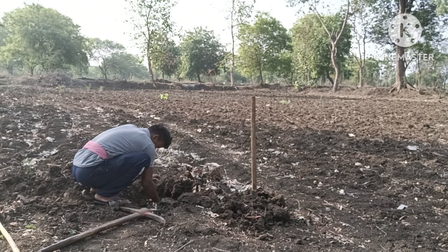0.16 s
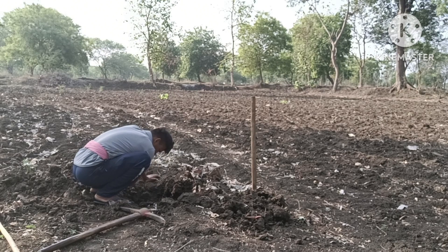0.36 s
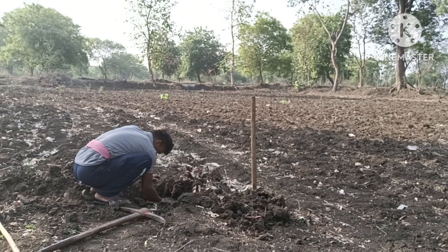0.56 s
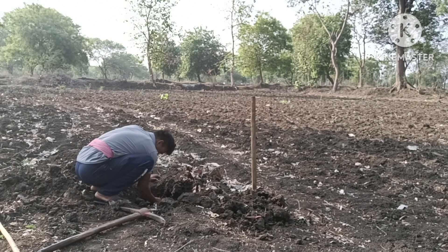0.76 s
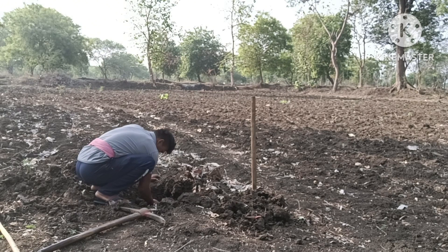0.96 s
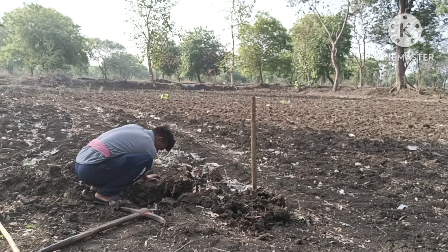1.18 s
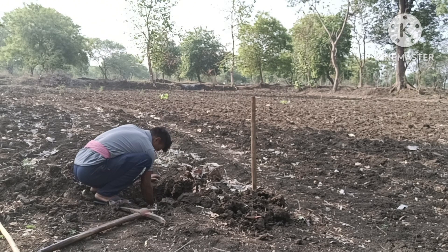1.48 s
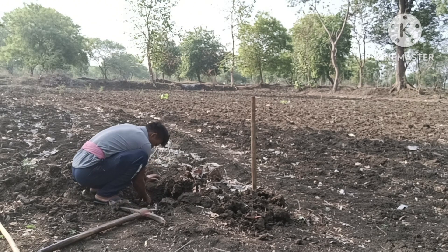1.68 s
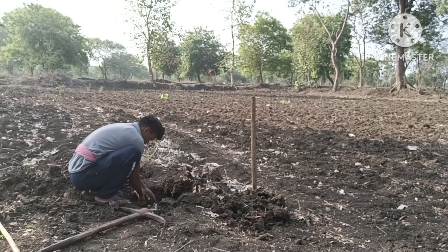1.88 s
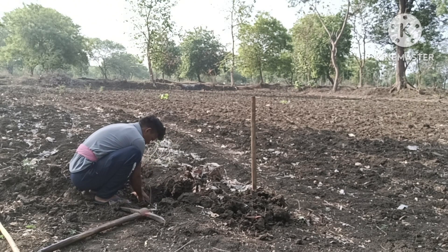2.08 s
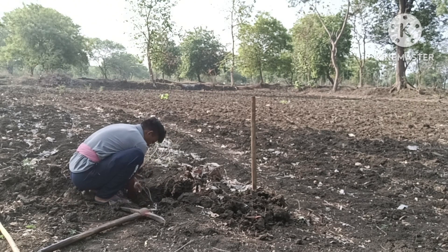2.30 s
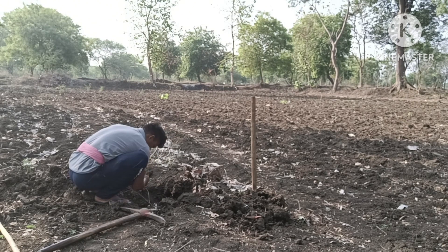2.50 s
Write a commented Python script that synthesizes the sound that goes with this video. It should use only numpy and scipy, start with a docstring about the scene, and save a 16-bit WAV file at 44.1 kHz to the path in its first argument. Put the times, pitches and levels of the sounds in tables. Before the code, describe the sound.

Hands scrape loose dry soil on the left, crumbs clicking in faint rustles; just before two seconds a handful lands sharply, then quieter scraping. Open field, thin bird chips, low breeze buffeting the stereo microphone.

```python
"""Crumbs click as hands rake loose dry soil in a shallow pit; one handful lands in a short, sharp spray.
The pit lies to the left in an open field: the right microphone port hears it weaker, later and scattered.
Strokes and spray are streams of tiny grain impacts; crumbs and clods are short damped rings with noise.
Small birds chip high and thin in the trees as gliding sines, with a short echo.
A breeze of banded noise and single eddies buffets each port on its own, over a faint hiss of air."""
import sys
import numpy as np
from scipy import signal
from scipy.fft import rfft, irfft, next_fast_len
from scipy.io import wavfile
from scipy.ndimage import uniform_filter1d

SR = 44100
rng = np.random.default_rng(int(sys.argv[2]) if len(sys.argv) > 2 else 0)


def int16_out(signal):
    """Quantize to a 16-bit WAV file."""
    q = np.round(np.clip(np.atleast_2d(signal).T, -1, 1) * 32767)
    wavfile.write(sys.argv[1], SR, q.astype(np.int16))


N = 116865
T = np.arange(N) / SR  # time [s]
SIZE = next_fast_len(N)

# hand strokes through the soil:
# (start [s], rise [s], hold [s], fall time constant [s], level [dB], treble tilt [dB per octave])
HAND_STROKES = [(0.07, 0.015, 0.014, 0.3, -62, -0.5), (0.349, 0.067, 0.048, 0.074, -55, -1),
                (0.734, 0.021, 0.066, 0.043, -63.5, 1.5), (1.096, 0.036, 0.16, 0.04, -54, 1),
                (1.631, 0.062, 0.013, 0.054, -43, -0.03), (1.789, 0.016, 0.0087, 0.018, -56, -7),
                (1.926, 0.022, 0.074, 0.036, -51, 0), (2.292, 0.029, 0.017, 0.044, -61.5, -6),
                (2.384, 0.11, 0.093, 0.033, -52, 1.2)]
# colour of the dry soil: (frequency [Hz], gain [dB])
SOIL_COLOUR = [(300, -42), (800, -22.5), (1500, -8), (2500, -5), (4000, -4), (5500, 2), (8000, -4),
               (12000, -1), (15500, -0.5)]
TRICKLE_DB, TRICKLE_PER_S, TRICKLE_SPREAD_DB = -70, 130, 6.5

# the grains that make up every stream of soil
GRAINS_PER_S, GRAIN_SPREAD_DB, GRAIN_CYCLES = 3400, 2, 6.9  # fall time in cycles of each band
CLUMP_DB, CLUMP_S = 2.7, 0.0083
GRAIN_HZ = 500 * 2 ** np.arange(0, 5.1, .5)  # half-octave band centres
# sharply snapping grains: damping, level beside the rustle, share of the rate, spread of size
SNAP_DAMP_S, SNAP_DB, SNAP_SHARE, SNAP_SPREAD_DB = .00035, 1.5, .45, 4.5
PINGS_PER_S, PING_RING_S, PING_SPREAD_DB, PING_DB = 800, .0018, 3.6, -4

# colour of the thrown handful: (frequency [Hz], gain [dB])
HANDFUL_COLOUR = [(300, -12), (480, -13.5), (700, -5), (950, -9.5), (1500, -4.5), (2300, -2.5),
                  (4500, -3.5), (8000, -3), (15500, -1.5)]
THROW_S, THROW_RISE_S, THROW_HOLD_S, THROW_FALL_S = 1.8422, 0.00073, 0.052, 0.023
THROW_DB, THROW_PER_S = -31, 7600

# single crumbs and grit snapping:
# (start [s], level before trim and colour [dB], ring pitch [Hz], relative setting of the crack [dB])
CRUMB_SNAPS = [(.0345, -44, 5200, -14), (0.043, -40, 5300, -16), (.112, -27.5, 6400, 5),
               (.301, -43, 5540, -12), (0.341, -45, 5000, -5), (0.346, -34, 4340, -11),
               (.4421, -15, 6240, 6), (0.474, -35.5, 5500, -11), (.532, -27.5, 4860, -3),
               (.607, -33.5, 6200, -27), (.617, -32, 4950, -23), (0.6593, -41.5, 6040, -6),
               (.748, -36, 5740, -11), (.766, -38, 7300, 8), (0.7842, -28.5, 10700, -12),
               (.812, -30.5, 10500, 2), (1.0187, -32.5, 4960, -17), (1.071, -53, 10400, 20),
               (1.13, -48, 7100, 2), (1.14, -30.5, 6900, 8), (1.201, -31, 9000, 5), (1.208, -30, 6750, 12),
               (1.222, -25.5, 7600, -7), (1.23, -24.5, 5560, 0), (1.2605, -50, 13000, -2),
               (1.2745, -25, 9100, 6), (1.3177, -32, 10000, 1), (1.474, -48, 5500, 2),
               (1.5105, -42, 10400, -5), (1.542, -42.5, 11000, 3), (1.576, -43.5, 10000, 0),
               (1.662, -34, 2900, -12), (1.681, -23.5, 10600, 6), (1.847, -13, 9200, -3),
               (1.8487, -27, 10000, -4), (1.865, -16, 5430, -8), (1.888, -12.5, 5000, -11),
               (1.913, -17, 6000, -3), (1.964, -32, 7400, 7), (2.3385, -42, 6100, 11),
               (2.4215, -34, 12000, -14), (2.471, -39.5, 7060, 3)]
# small crumbs radiate little bass: (frequency [Hz], gain [dB])
CRUMB_BODY = [(400, -6.5), (1000, -12), (2000, -4), (4000, 0.5), (15500, -3.5)]
CRUMB_RING_S, CRUMB_CRACK_S, CRUMB_CRUNCH_S = 0.00032, 0.00018, 0.0041
DUST_FALL_S, DUST_DB, CRUMB_TRIM_DB = 0.0064, -17.5, -4.5

# larger clods knocking dully: (start [s], level [dB], pitch [Hz], fall time constant [s])
CLOD_KNOCKS = [(.036, -69, 900, .006), (.655, -74, 700, .012), (.811, -67, 750, .007),
               (1.068, -64, 750, 0.0059), (1.849, -42, 690, .009), (2.468, -68.5, 800, 0.0068)]

# shading of the soil at the far, right port: (frequency [Hz], gain [dB])
FAR_PORT_SHADING = [(600, -1.5), (1300, 5.5), (2200, 7.5), (4400, -4.5), (8000, -2.5), (15000, -4.5)]
SOIL_RIGHT_DB, SOIL_LAG_S, SOIL_DIFFUSE, SOIL_SCATTER_S = -8.5, .00026, 1, 0.0056

# bird note shapes, each: (share of the note [0 to 1], pitch before the note's factor [Hz], level [dB])
SLUR = [(0, 11800, -28), (0.199, 11330, -8.5), (0.378, 8800, -13), (.52, 6750, -4), (.68, 6020, -2.5),
        (0.999, 4890, -22.5)]
CHIP = [(0, 5600, -27), (.25, 7120, 0), (.6, 8300, -5), (1, 8000, -35)]
WHISTLE = [(0, 5830, -8), (.2, 5520, -4), (.45, 5380, -3), (.75, 5400, -3.5), (.9, 5520, -6), (1, 5780, -8)]
TSIP = [(0, 11300, -6), (.25, 12100, -7), (.6, 11930, -9.5), (1, 11800, -20)]
FALL = [(0, 13400, -12), (.4, 12840, -3), (1, 11900, -16)]
RISE = [(0, 7700, -2), (0.301, 8600, -13), (0.699, 9200, 0), (1, 10100, -7)]
# bird notes: (start [s], length [s], pitch factor [ratio], level added to the shape [dB], shape [table])
BIRD_NOTES = [(0.111, .12, 0.98, -62, WHISTLE), (0.137, 0.016, 1, -66, CHIP),
              (0.197, 0.044, 0.99, -63.5, SLUR), (0.341, 0.018, 0.98, -64, CHIP),
              (.396, .048, .98, -62, SLUR), (.568, 0.014, 1.01, -64, FALL), (.657, .02, 1, -63.5, FALL),
              (.85, .018, 0.96, -67, TSIP), (0.912, 0.071, 1, -66, TSIP), (1.077, 0.033, .95, -64, TSIP),
              (1.325, .03, 1.03, -63, TSIP), (1.353, .05, 1.08, -66, TSIP),
              (1.416, 0.058, 1.04, -68.5, RISE), (1.434, 0.013, .94, -66, FALL),
              (1.462, .03, 1.04, -67, TSIP), (1.559, 0.046, 0.98, -74, RISE), (1.599, .03, 1.05, -67, TSIP),
              (2.073, 0.038, 0.94, -57.5, SLUR), (2.216, 0.017, 0.96, -60, CHIP),
              (2.272, 0.049, 0.94, -58, SLUR), (2.436, 0.017, 1, -61.5, CHIP), (2.489, 0.057, 1, -59, SLUR)]
BIRD_GLIDE_S = 0.0027  # the time in which pitch bends
BIRD_PAN_DB, TREES_DB, TREES_FALL_S = 4.5, 5, 0.0092  # left over right; echo over direct; echo fall

# strength of the breeze at each port: (time [s], level before trim [dB])
LEFT_BREEZE = [(0, -64.5), (.22, -53), (.31, -61), (.43, -51.5), (.47, -76), (.59, -41.5), (.68, -51),
               (.74, -44.5), (.8, -59.5), (1.02, -57), (1.06, -40.5), (1.1, -62), (1.3, -47.5),
               (1.34, -36.5), (1.44, -43), (1.5, -36), (1.66, -42), (1.71, -56.5), (1.77, -47), (1.97, -61),
               (2.15, -35.5), (2.29, -35), (2.33, -43), (2.38, -39), (2.43, -53.5), (2.65, -64)]
RIGHT_BREEZE = [(0, -62.5), (.23, -50.5), (.3, -55), (.46, -55.5), (.51, -36.5), (.63, -49), (.92, -45.5),
                (1.14, -47.5), (1.22, -51), (1.26, -47), (1.44, -41.5), (1.52, -62), (1.57, -43),
                (1.7, -58.5), (1.77, -35.5), (1.83, -60), (1.93, -56.5), (2.0, -37), (2.1, -38),
                (2.16, -52), (2.34, -42), (2.44, -54.5), (2.65, -52)]
# colour of the turbulence: (frequency [Hz], gain [dB])
WIND_COLOUR = [(20, -41.5), (35, -30.5), (55, -14), (85, -0.5), (125, -1), (200, -8.5), (300, -22.5),
               (450, -38), (700, -52), (1200, -63)]
# stronger wind sheds smaller eddies: dB per octave for each dB above the reference
WIND_REF_DB, WIND_BRIGHTEN, WIND_TRIM_DB = -34.5, 0.25, -1
# eddies that thump a port:
# (centre [s], length [s], pitch [Hz], level before sharing [dB], place [0 left to 1 right])
PORT_EDDIES = [(.495, .006, 203, -34, 0.93), (0.513, 0.0044, 157, -28, .97),
               (.531, 0.0039, 230, -33.5, 0.9), (0.568, 0.0047, 166, -33, 0.89),
               (.748, 0.0064, 113, -26.5, 0.12), (0.911, 0.0028, 237, -35, 0.89),
               (.954, 0.0059, 178, -35.5, 0.85), (1.367, 0.0045, 243, -33, 1),
               (1.485, 0.017, 124, -29, .03), (1.644, 0.0053, 184, -31, .03), (1.775, 0.0031, 256, -33, 1),
               (1.885, .006, 123, -28, 1), (2.005, 0.01, 105, -24.5, 0.97), (2.092, 0.0028, 290, -31, 1),
               (2.123, 0.0044, 190, -22, 0.57), (2.143, 0.0047, 153, -23.5, .03),
               (2.158, 0.0025, 270, -25, 0.04), (2.21, 0.0072, 164, -26, .03),
               (2.222, 0.0024, 297, -25, 0.068), (2.29, 0.0023, 352, -26, 0.042),
               (2.345, 0.0021, 310, -37, 1), (2.358, 0.0051, 131, -31, .95)]

# faint hiss of the field: (frequency [Hz], gain [dB])
AIR_COLOUR = [(300, 0), (600, -0.5), (1200, 0.5), (2000, -4), (4000, -1), (7000, -4), (15000, -5.5)]
AIR_DB = -75.5
TOP_HZ = 15700


def raking():
    """Each stroke shears a stream of grains; a few keep trickling in between."""
    trickle = grains(TRICKLE_PER_S, TRICKLE_SPREAD_DB, CLUMP_DB)
    out = amp(TRICKLE_DB) * unit(colour(trickle, SOIL_COLOUR))
    stream = grains(GRAINS_PER_S, GRAIN_SPREAD_DB, CLUMP_DB)
    for start, rise, hold, fall, db, tilt in HAND_STROKES:
        stroke = unit(colour(stream, SOIL_COLOUR, tilt))
        out = out + amp(db) * envelope(start, rise, hold, fall) * stroke
    return out


def handful():
    """A handful of crumbs lands almost at once: a fine, even spray with a sharp front."""
    spray = unit(colour(grains(THROW_PER_S, spread_db=5.0, clump_db=1.2), HANDFUL_COLOUR))
    return amp(THROW_DB) * spray * envelope(THROW_S, THROW_RISE_S, THROW_HOLD_S, THROW_FALL_S)


def crumbs():
    """Each crumb crunches briefly, snaps with a very short ring and a crack, and sheds a little dust."""
    out = np.zeros(N)
    noise = unit(colour(rng.standard_normal(N), SOIL_COLOUR))
    for start, db, hz, crack_db in CRUMB_SNAPS:
        near = abs(T - start) < .05
        u = T[near] - start
        age = np.maximum(u, 0)
        attack = 1 - np.exp(-age * hz)
        ring = np.sin(2 * np.pi * hz * age) * attack * np.exp(-age / CRUMB_RING_S)
        crack = amp(crack_db) * (u > 0) * np.exp(-age / CRUMB_CRACK_S)
        # the crunch swells up to the snap, then the dust dies away
        dust = amp(DUST_DB) * np.exp(np.minimum(u / CRUMB_CRUNCH_S, -age / DUST_FALL_S))
        out[near] += amp(db + CRUMB_TRIM_DB) * (2 * ring + noise[near] * (.5 * crack + dust))
    return colour(out, CRUMB_BODY)


def clods():
    """A larger clod lands with a low, quickly damped ring and a dull crumble."""
    out = np.zeros(N)
    for start, db, hz, fall in CLOD_KNOCKS:
        age = np.maximum(T - start, 0)
        crumble = unit(band(rng.standard_normal(N), hz))
        knock = np.sin(2 * np.pi * hz * age) + .5 * crumble
        out += amp(db) * knock * (1 - np.exp(-age * hz)) * np.exp(-age / fall)
    return out


def impacts(per_s, spread_db):
    """Energies of randomly timed impacts, mostly small and a few large."""
    hits = rng.random(N) < per_s / SR
    size = np.minimum(rng.exponential(size=N), 4.5)
    return hits * amp(spread_db * size) ** 2


def grains(per_s, spread_db, clump_db):
    """Tiny impacts of all pitches come in clumps: each snaps and rattles, a few ring."""
    broad = impacts(per_s, spread_db)  # shared by all bands
    rustle = np.zeros(N)
    for hz in GRAIN_HZ:
        energy = impacts(per_s, spread_db) + broad
        rustle += np.sqrt(hz) * rattle(energy, hz, GRAIN_CYCLES / hz)
    keep = np.exp(-2 / (SNAP_DAMP_S * SR))
    snap_hits = impacts(SNAP_SHARE * per_s, SNAP_SPREAD_DB) + 1e-18
    snaps = rng.standard_normal(N) * np.sqrt(signal.lfilter([1], [1, -keep], snap_hits))
    out = unit(rustle) + amp(SNAP_DB) * unit(snaps) + amp(PING_DB) * unit(pings())
    clumps = np.interp(T / CLUMP_S, np.arange(N), rng.standard_normal(N))
    return out * amp(clump_db * clumps)


def rattle(energy, hz, fall_s):
    """Bursts of energy die away as noise around one frequency."""
    keep = np.exp(-2 / (fall_s * SR))
    level = np.sqrt(signal.lfilter([1 - keep], [1, -keep], energy + 1e-18))
    return level * unit(band(rng.standard_normal(N), hz))


def pings():
    """Hard bits of grit, each ringing briefly at its own pitch."""
    out, age = np.zeros(N + SR // 30), T[:SR // 30]
    for place, pitch, size in rng.random((int(PINGS_PER_S * N / SR), 3)):
        hz = 1500 + 14000 * pitch
        first = int(place * N)
        level = amp(-PING_SPREAD_DB * np.log(size + 0.05))
        ring = np.sin(2 * np.pi * hz * age) * np.exp(-age / PING_RING_S)
        out[first:first + len(age)] += level * ring
    return out[:N]


def from_left(x):
    """The right port hears the soil weaker, partly scattered by clods and slightly later."""
    scattered = np.zeros(N)
    for hz in GRAIN_HZ:
        scattered += rattle(band(x, hz) ** 2, hz, SOIL_SCATTER_S) * min(hz / 4000, 1)
    right = np.roll(x, round(SOIL_LAG_S * SR)) + SOIL_DIFFUSE * scattered
    right = colour(right, FAR_PORT_SHADING) / np.hypot(1, SOIL_DIFFUSE)
    return np.array([x, amp(SOIL_RIGHT_DB) * right])


def birds():
    """Pure gliding notes, stronger at the left port, with a short echo from the trees."""
    song = np.zeros(N)
    for start, length, factor, db, shape in BIRD_NOTES:
        share, hz, level_db = np.array(shape).T
        u = (T - start) / length
        gate = np.clip(10 * np.minimum(u, 1 - u), 0, 1)
        pitch = uniform_filter1d(factor * np.interp(u, share, hz), 1 + int(BIRD_GLIDE_S * SR))
        tone = np.sin(2 * np.pi * np.cumsum(pitch) / SR)
        song += gate * amp(db + np.interp(u, share, level_db)) * tone
    ports = []
    for side in (1, -1):  # left, right: each has its own echo
        echo = amp(TREES_DB) * tail(song, TREES_FALL_S)
        ports.append(amp(side * BIRD_PAN_DB / 2) * (song + echo))
    return np.array(ports)


def tail(x, fall_s):
    """A dense cloud of fading reflections with about the energy of the sound itself."""
    h = rng.standard_normal(SR // 4) * np.exp(-T[:SR // 4] / fall_s)
    return signal.fftconvolve(x, h / np.linalg.norm(h))[:N]


def breeze(strength):
    """Turbulence at one port in half-octave bands; it brightens as it grows."""
    db = np.interp(T, *np.array(strength).T)
    noise = colour(rng.standard_normal(N), WIND_COLOUR)
    noise = noise / np.sqrt(uniform_filter1d(noise ** 2, SR // 30))  # even out its own swells
    pivot_hz = 110
    out = np.zeros(N)
    for octave in np.arange(-2.5, 3.6, .5):
        tilt = amp(WIND_BRIGHTEN * octave * (db - WIND_REF_DB))
        out += band(noise, pivot_hz * 2 ** octave) * tilt
    return amp(db + WIND_TRIM_DB) * out


def eddies():
    """A strong eddy is a brief wobble of pressure, mostly at one port."""
    out = np.zeros((2, N))
    for centre, length, hz, db, place in PORT_EDDIES:
        u = T - centre
        wobble = np.sin(2 * np.pi * (hz * u + rng.random()))
        puff = amp(db) * wobble / np.cosh(np.clip(2 * u / length, -20, 20))
        out += np.outer([1 - place, place], puff)
    return out


def air():
    """The faint hiss of the field: steady coloured noise, independent at each port."""
    return np.array([amp(AIR_DB) * unit(colour(rng.standard_normal(N), AIR_COLOUR)) for _ in range(2)])


def amp(db):
    """Amplitude ratio of a level in dB."""
    return 10 ** (np.asarray(db) / 20)


def unit(x):
    """Scale a sound to an RMS of one."""
    return x / np.sqrt(np.mean(x ** 2))


def colour(x, points, tilt_db=0):
    """Filter by (frequency [Hz], gain [dB]) points, with a tilt per octave."""
    octave = np.log2(np.fft.rfftfreq(SIZE, 1 / SR) + 1)
    hz, db = np.array(points).T
    gain_db = np.interp(octave, np.log2(hz), db) + tilt_db * (octave - octave.mean())
    return irfft(rfft(x, SIZE) * amp(gain_db), SIZE)[:N]


def band(x, hz):
    """The part of a sound within half an octave of a frequency."""
    octave = np.log2(np.fft.rfftfreq(SIZE, 1 / SR) / hz + 1e-9)
    return irfft(rfft(x, SIZE) * np.sqrt(np.maximum(1 - 2 * abs(octave), 0)), SIZE)[:N]


def envelope(start, rise, hold, fall):
    """Swelling rise, hold, exponential fall."""
    swell = np.clip((T - start) / rise, 0, 1) ** 1.94
    return swell * np.exp(-np.maximum(T - start - rise - hold, 0) / fall)


def scene():
    """The soil on the left, then birds, wind at the two ports and the hiss of the field."""
    soil = from_left(raking() + handful() + crumbs() + clods())
    wind = np.array([breeze(LEFT_BREEZE), breeze(RIGHT_BREEZE)]) + eddies()
    return soil + birds() + wind + air()


def record(dry):
    """The recorder cuts the top with a steep low-pass."""
    return signal.sosfilt(signal.ellip(10, .2, 70, TOP_HZ, fs=SR, output="sos"), dry)


dry = scene()
out = record(dry)
int16_out(out)
```